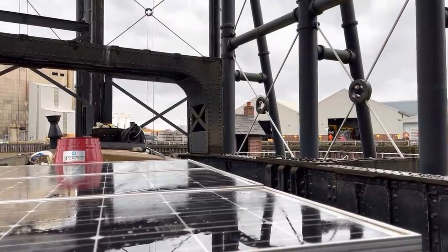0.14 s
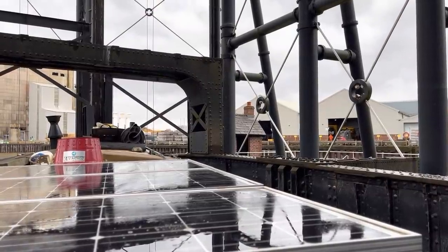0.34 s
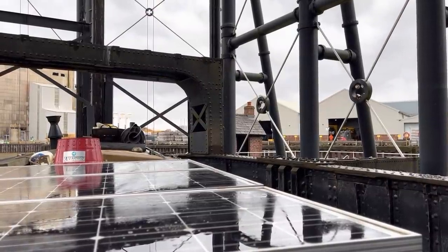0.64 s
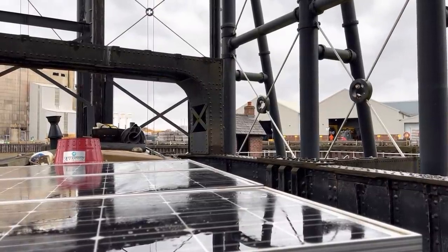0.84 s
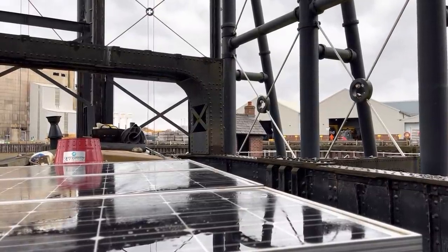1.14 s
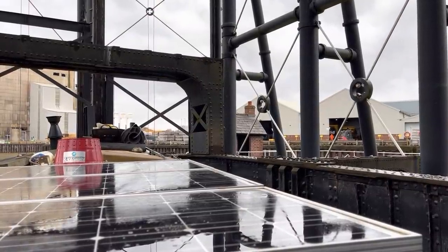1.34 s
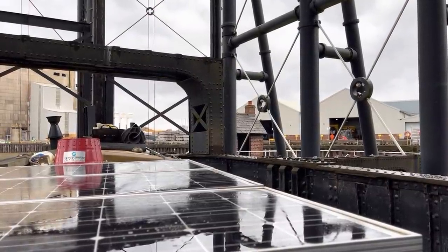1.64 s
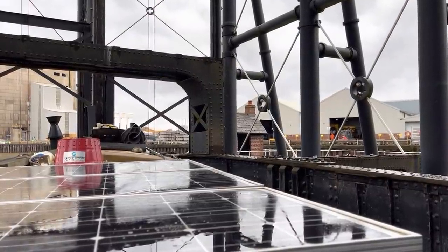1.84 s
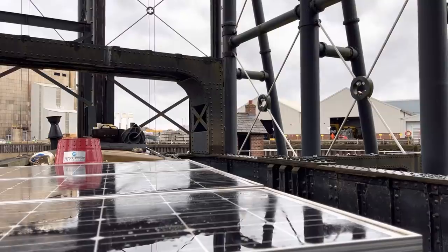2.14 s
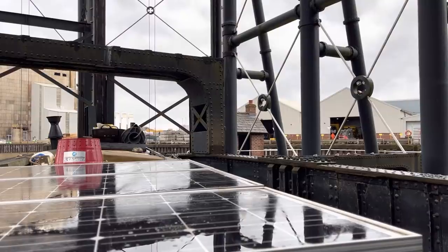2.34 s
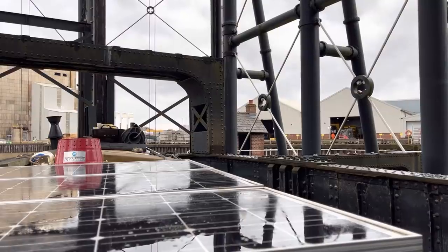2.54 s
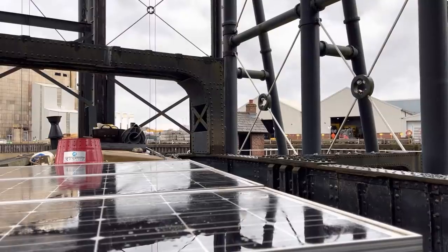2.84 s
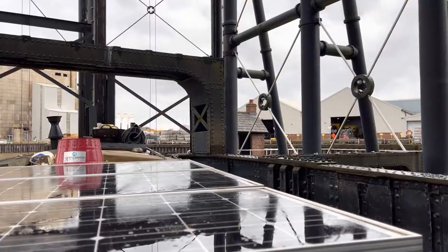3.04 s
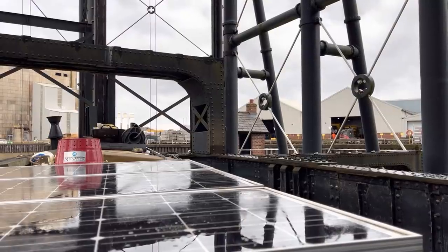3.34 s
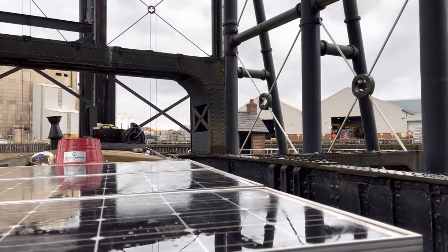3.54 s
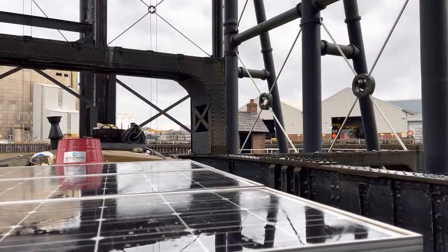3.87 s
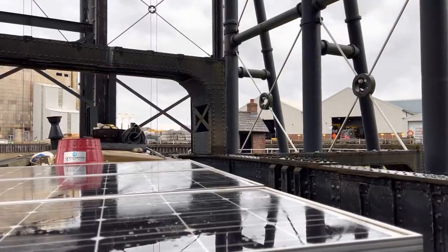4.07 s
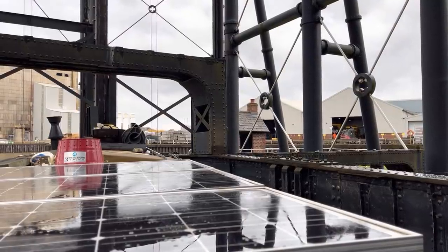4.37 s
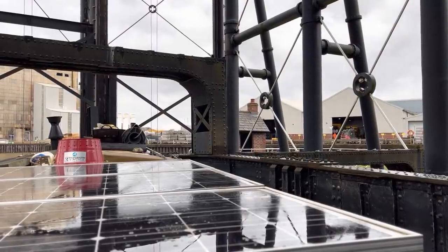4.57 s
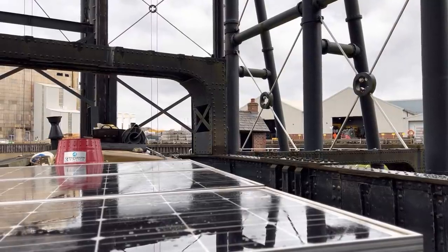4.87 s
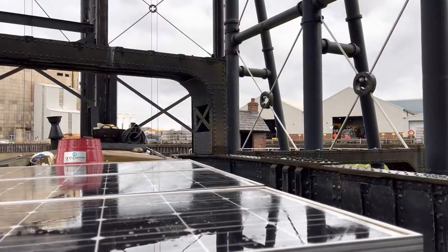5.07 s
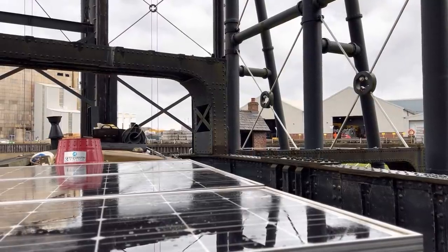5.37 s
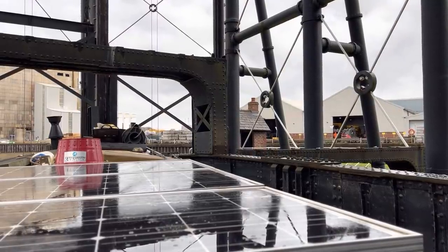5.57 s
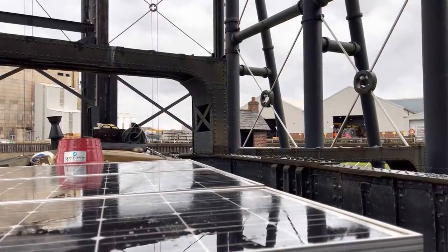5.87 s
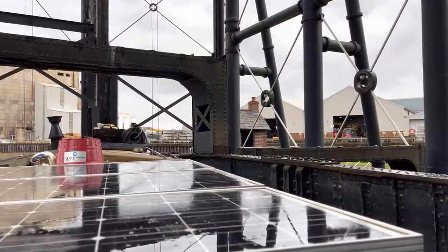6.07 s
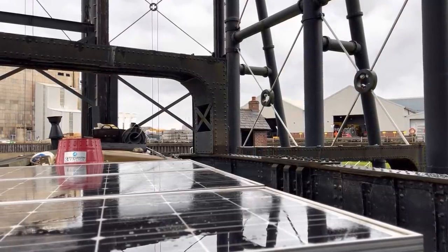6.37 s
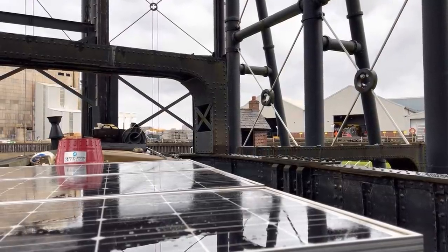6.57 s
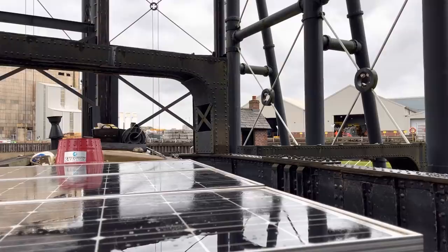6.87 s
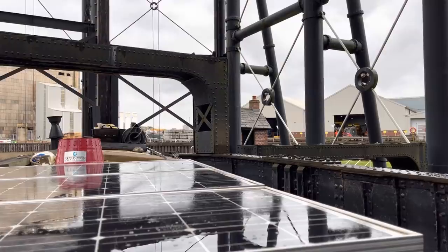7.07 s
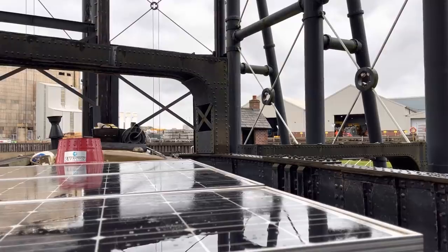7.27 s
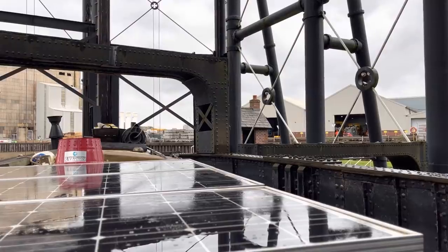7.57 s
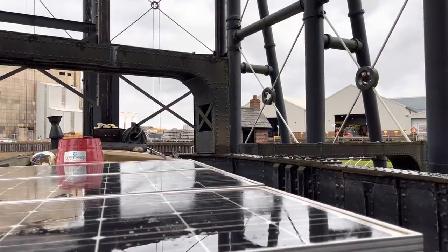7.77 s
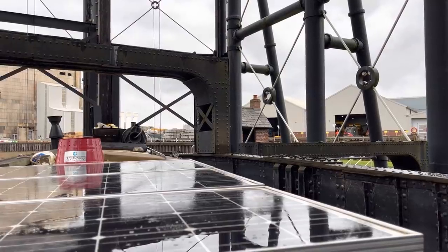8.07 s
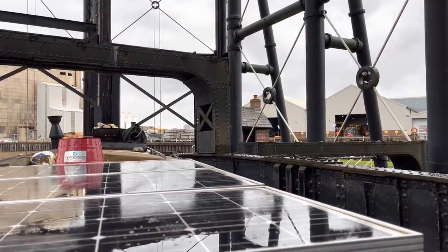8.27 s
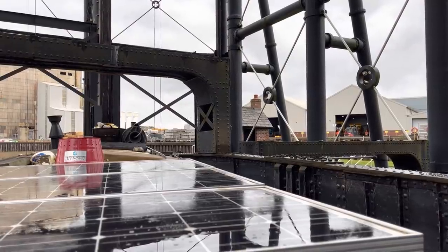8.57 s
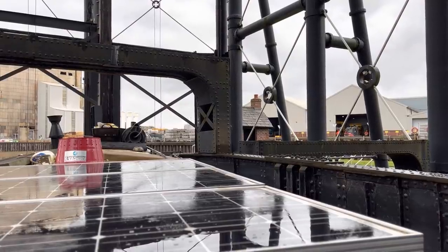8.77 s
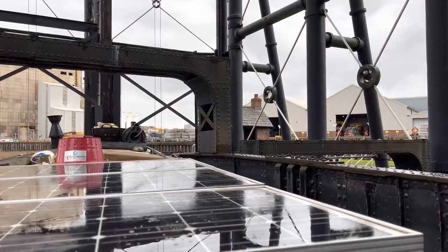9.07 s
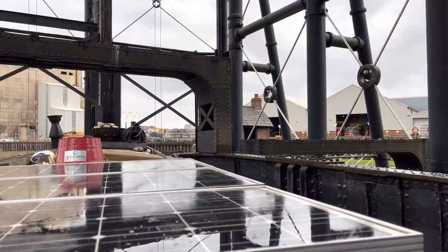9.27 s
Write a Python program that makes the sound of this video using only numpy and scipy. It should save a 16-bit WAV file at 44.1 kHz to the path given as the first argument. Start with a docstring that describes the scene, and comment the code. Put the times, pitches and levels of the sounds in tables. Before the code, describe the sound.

A steady hydraulic pump hum, one pure low note a little above 220 hertz, runs from 0 to about 9.4 seconds, with weak overtones drifting in level between left and right and a barely audible thin whine. Beneath it is a soft, dull machinery and town hiss, rising very slightly. At 0 a wind pop and short fluttering gust hit the microphone; a smaller gust follows at 0.3 and a sharp thump at 1.8. Low rumble swells gently around 2 to 4 seconds, with a tiny far chirp at 2.7. From 5.5 to 5.7 a rapid group of pops arrives, then two near 6.2. The strongest buffeting starts with a loud thump at 6.8 and stays dense until 7.7, with faint bird-like chirps among it from 6.5. Afterwards the wind eases, one last faint chirp comes at 8.4, low rumble returns near 9, and the hum continues unbroken.

```python
"""On an open steel lift, a hydraulic pump hums from the start on one pure note; overtones fade with the echoes.
A pop and a gust come first, over machinery and town hiss that rises slightly all along.
Wind rumbles and flutters on the two microphone ports, as shaped noise; from 2.7 s a few far chirps whistle.
Pops, short swings pushed onto both ports, return in number near 5.5 s and come thickest from 6.8 to 7.7 s,
while the pump, a sum of sines, hums on to the end."""
import sys
import numpy as np
from scipy import signal
from scipy.fft import rfft, irfft, next_fast_len
from scipy.io import wavfile
from scipy.ndimage import uniform_filter1d

SR = 44100
rng = np.random.default_rng(int(sys.argv[2]) if len(sys.argv) > 2 else 0)


def output_pcm(signal):
    """Save a mono or channel-first signal as 16-bit PCM at the path in sys.argv[1].

    Samples are clipped to [-1, 1] before scaling.
    """
    pcm = np.clip(np.atleast_2d(signal).T, -1, 1) * 32767
    wavfile.write(sys.argv[1], SR, np.round(pcm).astype(np.int16))


N = 415422
TIME = np.arange(N) / SR
LONG = next_fast_len(N, real=True)  # transform length, samples
HZ = np.maximum(np.arange(LONG // 2 + 1) * SR / LONG, 1)  # frequency of each transform bin
SIDES = np.array([[.5], [-.5]])  # splits a left-right difference over the left and right port

# Spectral shape of the machinery and town hiss. Each row: frequency in Hz, relative density in dB per Hz.
HISS_SPECTRUM = [(100, -8.5), (250, 0.5), (400, -6.5), (540, -9.5), (630, -9.5), (760, -12.5), (830, -10),
                 (1020, -14.5), (1190, -11), (1270, -16.5), (1450, -21.5), (1900, -19.5), (2300, -23.5),
                 (2680, -23), (2900, -26), (3500, -26), (3600, -27), (5000, -30.5), (6700, -32.5),
                 (8500, -30), (10600, -32), (11300, -32.5), (11800, -49.5)]
# Left-right likeness, lead and level of the hiss by frequency. Each row: frequency in Hz,
# likeness 0 to 1, left lead in rad, left minus right level in dB.
HISS_STEREO = [(400, 0.3, 0, -0.5), (2000, 0.1, 0, 0), (2500, 0.65, 0.63, 1.6), (3000, 0.31, 1.26, 1.9),
               (5200, 0.27, 0.69, 2.3), (6000, 0.59, 0.32, 2.8), (7000, 0.54, 0.19, 5.0),
               (7500, 0.73, 0.97, 2.6), (8300, 0.92, 0.14, 0.3), (8900, 0.94, -0.1, 0.1),
               (9400, 0.74, -1.72, 0.1), (9900, 0.91, -3.0, -0.0), (10800, 0.69, -3.87, 0.3),
               (11200, 0.46, -5.03, 0.1), (11500, 0.95, -6.26, 0.0)]
# Borders in Hz of the hiss bands that flicker apart.
HISS_BAND_BORDERS = (350, 700, 1050, 1400, 1900, 2400, 3000, 4200, 5600, 9000)
# Far chirps. Each row: start in seconds, length in seconds, start pitch in Hz, end pitch in Hz,
# middle level in dB, left lead in rad.
FAR_CHIRPS = [(2.665, .03, 4100, 3900, -60, 1.0), (6.54, .08, 7200, 6900, -59, 1.5),
              (6.76, .06, 5380, 5300, -56, 2.4), (7.01, .08, 6950, 6700, -61, 1.5),
              (7.125, .035, 5300, 6030, -59, 1.0), (7.285, .03, 5300, 5900, -61, .3),
              (7.33, .03, 5600, 5800, -61, .3), (8.39, .07, 6150, 6100, -61, .5)]
# Spectral shapes of the wind: rumble, deepest rumble, flutter.
# Each row: frequency in Hz, relative density in dB per Hz.
RUMBLE_SPECTRUM = [(25, -42), (45, -17), (70, 2.5), (120, 1), (180, -11.5), (260, -32), (500, -74),
                   (1000, -120)]
DEEP_SPECTRUM = [(10, -49), (20, -31), (35, -18), (50, 7), (65, -2), (100, -14), (200, -83)]
FLUTTER_SPECTRUM = [(50, -70), (100, -24), (170, 6), (240, 2.5), (320, -6.5), (450, -13), (700, -39),
                    (1000, -65), (2000, -120)]
# The breeze under the gusts. Each row: time in seconds, rumble level in dB,
# deep rumble against rumble in dB, flutter level in dB.
BREEZE_LEVELS = [(0, -37.5, -13, -37), (.7, -37.5, -9, -34.5), (1.2, -40.5, -21, -36.5),
                 (1.9, -36, -17, -31), (2.6, -35.5, -11, -37.5), (3.3, -31.5, -14, -36),
                 (4, -31.5, -4, -37.5), (4.3, -33.5, -16, -38.5), (5.3, -32.5, -14, -37.5),
                 (5.9, -36.5, -6, -35.5), (6.6, -29.5, -16, -39.5), (7.8, -39, -1, -38.5),
                 (8.4, -40, -36, -37.5), (8.95, -31.5, -24, -41.5), (9.42, -31.5, -16, -36)]
# Gusts on the ports. Each row: start of full strength in seconds, hold in seconds, rumble level in dB,
# deep rumble against rumble in dB, flutter level in dB.
PORT_GUSTS = [(0, 0.016, -22.5, -18, -20.5), (0.33, 0.04, -33, -6, -29.5), (2.086, 0.15, -30, -11, -41),
              (2.776, 0.068, -27.5, -8, -32), (3.785, 0.054, -27.5, -11, -44), (4.765, 0.21, -34, 1, -54),
              (5.5, 0.16, -35, 6, -35.5), (6.175, 0.014, -26, -12, -34), (6.239, 0.023, -29.5, 2, -25.5),
              (6.333, 0.099, -30.5, -2, -38), (6.825, 0.077, -22.5, -0.5, -29.5),
              (6.988, 0.11, -22, -4, -28), (7.143, 0.024, -22.5, -5, -31), (7.261, 0.038, -24, -10, -32.5),
              (7.437, 0.041, -23, -14, -27.5), (7.53, 0.097, -31.5, -17, -29),
              (7.653, 0.016, -25, -15, -31)]
# Wind pops. Each row: time of the thump in seconds, thump level in dB, thump pitch in Hz,
# snap against thump in dB, wake against thump in dB.
WIND_POPS = [(0.004, -15, 235, -15, -16), (1.8133, -12.5, 265, -16, -13), (5.493, -19, 187, -20, -3),
             (5.520, -20.5, 230, -22, -14), (5.5438, -20, 221, -16, -5), (5.559, -20, 293, -5, -13),
             (5.59, -13, 196, -10, -9), (5.611, -15.5, 202, -22, -10), (5.663, -13, 220, -17, -10),
             (5.681, -13, 220, -21, -19), (5.6963, -13, 209, -23, -18), (6.185, -16.5, 227, -11, -13),
             (6.27, -17.5, 225, -5, -7), (6.811, -5.5, 271, -11, -15), (6.850, -13.5, 191, -22, -9),
             (6.870, -10, 179, -26, -8), (6.8788, -14, 235, -26, -17), (6.951, -16, 148, -20, -1),
             (7.032, -8, 170, -24, -6.5), (7.0592, -7, 193, -21, -17), (7.07, -17.5, 310, -13, -2),
             (7.160, -14, 150, -20, -6), (7.3277, -12.5, 213, -24, -2), (7.399, -16, 307, -7, -12),
             (7.4041, -8, 170, -24, -12), (7.425, -12, 374, -14, -9.5), (7.4579, -11.5, 256, -20, -6),
             (7.513, -16, 200, -23, -20), (7.54, -10, 230, -13, -19), (7.567, -17.5, 250, -18, -1),
             (7.5883, -14, 201, -19, -4), (7.6455, -16, 312, -2, -16), (7.653, -10.5, 189, -18, -13),
             (7.6613, -18, 193, -16, -12), (7.689, -15.5, 210, -20, -21)]
# The pump's overtones at the ports, keyed by multiple of its note. Each row: time in seconds,
# middle left level in dB, middle right level in dB, left lead in rad.
PUMP_OVERTONES = {1: [(0, -28.5, -25, -1.7), (4.8, -28.5, -25.5, -1.75), (5.7, -30, -27.5, -2.45),
                  (7.2, -28, -29.5, -2.4), (9.42, -24.5, -29, -2.5)], 2: [(0, -62, -55, 0),
                  (1.4, -50, -64, 1.2), (3.5, -48, -48, 2.7), (4.2, -43, -41, 2.2), (4.8, -42, -41, 2.4),
                  (5.8, -42, -36, 2.4), (6.7, -48, -36.5, 2.3), (7.4, -39, -36, 1.5), (8, -43, -41, 1.5),
                  (9.42, -47, -39, 1.0)], 3: [(0, -56, -51, -2.2), (2.6, -68, -52, 0), (5.3, -68, -57, 0),
                  (6.8, -58, -55, -2), (9.42, -62, -55, 1)], 4: [(0, -48, -52, -3), (.6, -45.5, -53, -2.7),
                  (1.2, -46.5, -49.5, -1), (2.2, -48, -51, -3.5), (2.7, -59, -52, -4),
                  (3.2, -55, -44, -2.5), (4.3, -49, -42, -2.4), (5.05, -59, -44.5, -2.3),
                  (5.3, -55, -48, -1.2), (5.75, -58, -59, 0), (6.5, -58, -63, -3), (7.3, -54, -55, -3.5),
                  (8.2, -64, -54, -3.4), (9.42, -52, -48, -3.2)], 5: [(0, -48, -54, -.8),
                  (.4, -50, -50, -.7), (.95, -66, -49, 0), (1.25, -48, -46, .6), (1.6, -45, -43, .4),
                  (2.15, -54, -50, .5), (2.6, -55, -56, 1.5), (3.65, -51, -63, 3.2), (4, -70, -67, 0),
                  (4.35, -51, -52, -1.4), (4.85, -42.5, -43.5, -.9), (5.6, -43.5, -47, -.7),
                  (6.0, -48, -53, -2.8), (6.7, -47, -52, -3.4), (7.15, -58, -52, -2), (7.5, -54, -47, -.7),
                  (8.2, -53, -47, -1.3), (8.55, -54, -51, -2.6), (8.8, -46, -52, -3.6), (9.1, -45, -53, -5),
                  (9.42, -50, -51, -5.2)], 7: [(0, -63, -60, -1.6), (2.5, -60, -56, -2.8),
                  (4.3, -61, -56, -2.3), (6.6, -58, -56, -2.1), (7.3, -58, -57, -2), (8, -80, -72, -2.4),
                  (9.42, -68, -65, -2)], 8: [(0, -68, -63, 2.8), (2.4, -72, -66, 2), (3.6, -60, -58, 3),
                  (5.1, -58, -63, 2.8), (5.8, -66, -61, .8), (6.4, -61, -57, 0), (7, -67, -62, .4),
                  (7.7, -61, -56, -.8), (8.7, -76, -64, -.5), (9.42, -62, -57, -3.4)]}
# Weaker overtones that fade by chance: multiples of the pump note, and their middle levels in dB.
FAINT_MULTIPLES = (6, 9, 10)
FAINT_LEVELS = (-65, -68, -72)

HISS_DB, HISS_RISE_DB_PER_S = -37.5, 0.1136  # level at the start, and its rise
GUST_LEAD = -.75  # left lead in rad in strong gusts and pops: below zero, so the right leads
GUST_RISE_S, GUST_FALL_S = 0.052, 0.075
SNAP_HZ, SNAP_EARLY_S = 470, 0.002  # the snap comes before the thump
WAKE_SINK_S, WAKE_PEAK_S = 0.0145, 0.012  # time for the pitch to halve, time of the loudest point
PUMP_HZ = 222.85
WHINE_HZ, WHINE_DB = 2521.9, -66
TOP_HZ = 11750


def undb(db):
    """Decibels to gain."""
    return 10 ** (np.asarray(db) / 20)


def curves(table, at=TIME, warp=np.asarray):
    """Columns of a table joined by straight lines along its first column, warped if asked."""
    first, *columns = np.transpose(table)
    return [np.interp(warp(at), warp(first), column) for column in columns]


def noise(spectrum, like, lead=0., pan_db=0.):
    """Two-port noise of rms 1 with a given spectrum, likeness, left lead and left-right level."""
    left, other = rfft(rng.standard_normal((2, LONG)))
    like = np.clip(like, 0, 1)
    right = like * left * np.exp(-1j * lead) + np.sqrt(1 - like ** 2) * other
    density_db = curves(spectrum, HZ, np.log)[0]
    out = irfft(np.array([left, right]) * undb(density_db + pan_db * SIDES), LONG)[:, :N]
    return out / np.sqrt(np.mean(out ** 2))


def walk(rate):
    """Random levels held 1 / rate s and smoothed twice; mean 0, spread 1."""
    hold = int(SR / rate)
    steps = np.repeat(rng.standard_normal(N // hold + 1), hold)
    smooth = uniform_filter1d(uniform_filter1d(steps, hold), hold)[:N]
    return (smooth - smooth.mean()) / smooth.std()


def hiss():
    """Broad machinery and town noise, rising a little; each band flickers on its own."""
    like, lead, pan_db = curves(HISS_STEREO, HZ)
    whole = rfft(noise(HISS_SPECTRUM, like, lead, pan_db), LONG)
    band_number = np.digitize(HZ, HISS_BAND_BORDERS)
    out = np.zeros((2, N))
    for k in np.unique(band_number):
        band = irfft(whole * (band_number == k), LONG)[:, :N]
        flicker_db = 0.75 * walk(9) + 0.35 * walk(1.57)
        out += band * undb(flicker_db)
    return out * undb(HISS_DB + HISS_RISE_DB_PER_S * TIME)


def chirps():
    """Short faint gliding whistles, perhaps far birds."""
    out = np.zeros((2, N))
    for s, length, from_hz, to_hz, db, lead in FAR_CHIRPS:
        n = int(length * SR)
        phase = 2 * np.pi * np.cumsum(np.linspace(from_hz, to_hz, n)) / SR
        # the whistle is rough: its level jumps every 200 samples, about 4.5 ms
        rough_db = 3.7 * rng.standard_normal(n // 200 + 1).repeat(200)[:n]
        whistle = np.sqrt(np.hanning(n)) * np.sin(phase + lead * SIDES)
        start = int(s * SR)
        out[:, start:start + n] += undb(db + rough_db) * whistle
    return out


def power(rumble_db, deep_db, flutter_db):
    """Power of rumble, deep rumble (given against the rumble) and flutter."""
    return undb([rumble_db, rumble_db + deep_db, flutter_db]) ** 2


def blowing():
    """Power of rumble, deep rumble and flutter: the breeze plus gusts that rise, hold and fall."""
    out = power(*curves(BREEZE_LEVELS))
    for s, hold, *levels_db in PORT_GUSTS:
        rise = 1 + (TIME - s) / GUST_RISE_S
        fall = 1 + (s + hold - TIME) / GUST_FALL_S
        shape = np.clip(np.minimum(rise, fall), 0, 1)
        out = out + power(*levels_db)[:, None] * shape ** 4
    return out


def eddies(spectrum, lead, apart):
    """Wind noise that both sides share up to a moving phase lead, plus a share that each has alone."""
    now, late = noise(spectrum, 0.94, np.pi / 2)  # mixing two quarter-turn-apart noises turns the phase
    shared = now * np.cos(lead * SIDES) - late * np.sin(lead * SIDES)
    return np.sqrt(1 - apart ** 2) * shared + apart * noise(spectrum, 0)


def wind():
    """Big eddies rumble, small ones flutter in bursts."""
    rumble, deep, flutter = np.sqrt(blowing())
    flutter_db = 20 * np.log10(flutter)
    # weak wind is in step left and right; in strong gusts the right leads
    gustiness = np.clip((flutter_db + 39.5) / 6, 0, 1)
    lead = GUST_LEAD * gustiness
    # the harder the gust, the more broken the flutter
    burst_db = np.clip(.2 * (flutter_db + 42.5), 0, 4) * walk(50)
    # the rumble comes in lumps, short and broken in a gust
    lumps = undb(2.0 * walk(9) + 1.7 * gustiness * walk(25))
    low = rumble * eddies(RUMBLE_SPECTRUM, lead, 0.21) + deep * eddies(DEEP_SPECTRUM, lead, 0.42)
    return lumps * low + flutter * undb(burst_db) * eddies(FLUTTER_SPECTRUM, lead, 0.32)


def swing(t, hz, turns, glide):
    """A brief swing about t = 0 whose pitch falls, on both ports."""
    u = hz * t
    phase = 2 * np.pi * (u - glide * u ** 2) - .8 + GUST_LEAD * SIDES
    return np.cos(phase) * np.exp(-(u / turns) ** 2)


def pops():
    """A sudden push on both ports: a bright snap, a thump, then a wake whose pitch sinks, the lows coming late."""
    half = SR // 10
    t = np.arange(-half, half) / SR
    after = np.maximum(t, 0)
    swell = after / WAKE_PEAK_S * np.exp(1 - after / WAKE_PEAK_S)
    out = np.zeros((2, N + 2 * half))
    for s, db, hz, snap_db, wake_db in WIND_POPS:
        thump = swing(t, hz, turns=0.66, glide=0.045)
        snap = swing(t + SNAP_EARLY_S, SNAP_HZ, turns=0.64, glide=0.27)
        # the wake's pitch sinks as 1 / (1 + t / WAKE_SINK_S)
        sinking = 2 * np.pi * hz * WAKE_SINK_S * np.log1p(after / WAKE_SINK_S)
        wake = swell * np.cos(sinking - .8 + GUST_LEAD * SIDES)
        start = int(s * SR)  # the padding of half puts the thump itself here
        out[:, start:start + 2 * half] += undb(db) * (thump + undb(snap_db) * snap + undb(wake_db) * wake)
    return out[:, half:half + N]


def tone(hz, db, lead):
    """A sine of rms db on each port, the left one ahead by lead."""
    start_phase = 2 * np.pi * rng.random()
    return np.sqrt(2) * undb(db) * np.sin(2 * np.pi * hz * TIME + start_phase + lead * SIDES)


def pump():
    """Pure overtones of the piston rate and a whine; echoes off the frame set level and phase at each port."""
    out = np.zeros((2, N))
    for k, table in PUMP_OVERTONES.items():
        left_db, right_db, lead = curves(table)
        # moving air bends the longer paths, more so for short waves
        sway_db = (0.6 + 0.12 * k) * np.array([walk(5), walk(5)])
        out += tone(k * PUMP_HZ, np.array([left_db, right_db]) + sway_db, lead)
    for k, db in zip(FAINT_MULTIPLES, FAINT_LEVELS):
        fade_db = 2.5 * np.array([walk(2.5), walk(2.5)])
        out += tone(k * PUMP_HZ, db + fade_db, 2.5 * walk(.8))
    whine_fade_db = 2.5 * np.array([walk(3), walk(3)])
    return out + tone(WHINE_HZ, WHINE_DB + whine_fade_db, .9)


def scene():
    """All sources at the two ports, from the background to the pump."""
    return hiss() + chirps() + wind() + pops() + pump()


def record(dry):
    """A 1.5 ms fade-in, then a steep cut of the top."""
    fade_in = np.sin(np.pi / 2 * np.minimum(TIME / .0015, 1)) ** 2
    top_cut = signal.ellip(10, .2, 70, TOP_HZ, fs=SR, output="sos")
    return signal.sosfilt(top_cut, dry * fade_in)


dry = scene()
out = record(dry)
output_pcm(out)
```